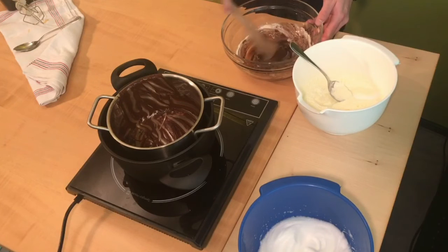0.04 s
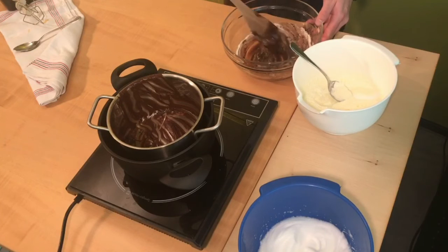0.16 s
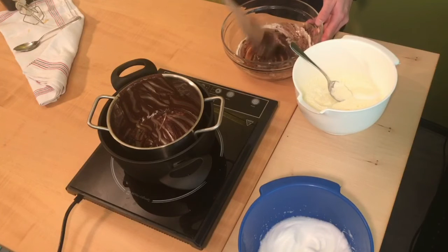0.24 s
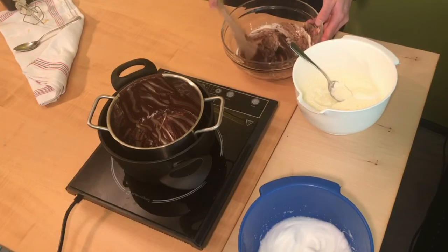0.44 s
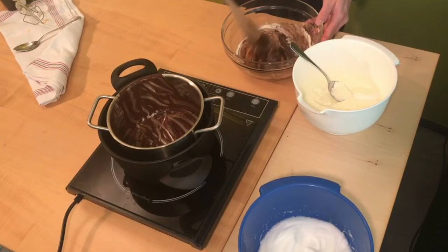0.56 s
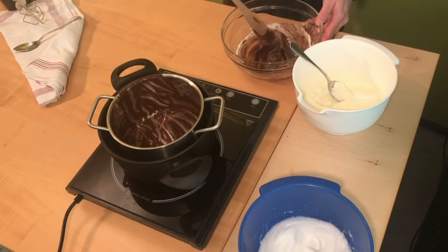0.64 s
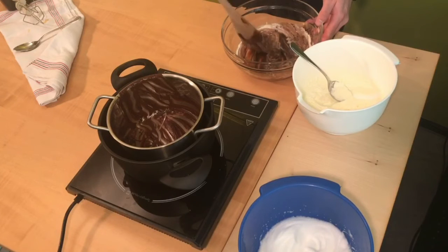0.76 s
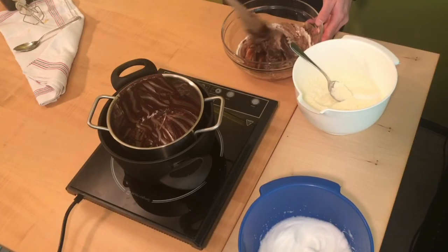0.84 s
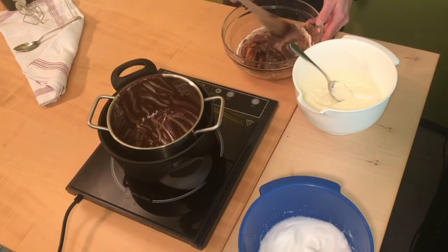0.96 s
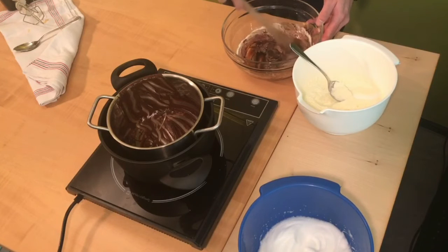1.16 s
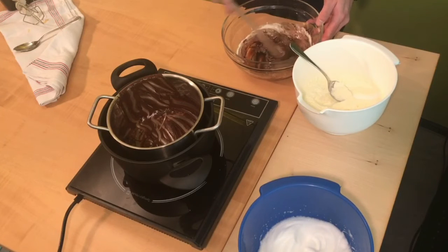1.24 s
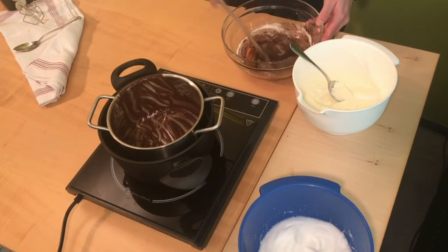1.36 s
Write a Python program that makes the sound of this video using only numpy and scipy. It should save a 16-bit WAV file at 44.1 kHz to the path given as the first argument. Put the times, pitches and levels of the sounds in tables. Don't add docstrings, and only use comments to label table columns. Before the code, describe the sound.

Wet crackle, tiny snaps and gritty blade drag as a spatula works a sticky mixture in a glass bowl, with four irregular knocks, the first loudest, short room reflections and faint fan noise, one mono microphone.

```python
import sys
import numpy as np
from scipy import signal
from scipy.io import wavfile

SR = 44100
rng = np.random.default_rng(int(sys.argv[2]) if len(sys.argv) > 2 else 0)


def volts_from_decibels(level):
    exponent = np.asarray(level, float) / 20
    return 10 ** exponent


def wav_out(sig):
    wavfile.write(sys.argv[1], SR, np.round(np.clip(np.atleast_2d(sig).T, -1, 1) * 32767).astype(np.int16))


N = 61739

# [start_s, level_db (peak), contact_rise_s, thud_db (worktop), room_db]
KNOCKS = [
    (0.2084, -11.5, 0.00054, -36, -10.5),
    (.5540, -28.5, 0.0006, -39.5, -8),
    (1.01, -27.5, 0.00014, -46, -12.5),
    (1.3585, -36, 0.00047, -56.5, -11),
]


def rms_one(x):
    return x / np.sqrt(np.mean(x ** 2) + 1e-20)


def at_hz(points, hz, axis=1):
    points = np.array(points)
    return np.interp(np.log(hz), np.log(points[:, 0]), points[:, axis])


def contour(times_s, levels_db):
    return volts_from_decibels(np.interp(np.arange(N) / SR, times_s, levels_db))


def seconds_after(start_s):
    return np.maximum(np.arange(N) / SR - start_s, 0)


def swell(t, rise_s):
    return 1 - np.exp(-(t / rise_s) ** 2)


def resonance(x, hz, width_hz):
    r = np.exp(-np.pi * width_hz / SR)
    zeros = np.array([1, 0, -1]) * (1 - r * r) / 2
    poles = [1, -2 * r * np.cos(2 * np.pi * hz / SR), r * r]
    return signal.lfilter(zeros, poles, x)


def bandpass(x, low_hz, high_hz):
    return signal.sosfilt(signal.butter(2, [low_hz, high_hz], "band", fs=SR, output="sos"), x)


def bands(white):
    edges = 20 * 2 ** np.arange(0, 10.1, .5)
    for k, (low, high) in enumerate(zip(edges, edges[1:])):
        yield np.sqrt(low * high), bandpass(white[k % 2], low, high)


def struck(start_s, hz, db, t60, rise_s):
    t = seconds_after(start_s)
    return volts_from_decibels(db - 60 * t / t60) * swell(t, rise_s) * np.sin(2 * np.pi * hz * t)


def background():
    # [pitch_hz, density_db (per Hz)]
    air_spectrum = [(12, -28), (20, 7), (67, -7.5), (285, -30), (422, -28), (499, -33.5), (2320, -29),
                    (2990, -35.5), (16000, -47.5)]
    # [pitch_hz, level_db (rms), width_hz]
    fan = [
        (1757, -80, 9),
        (49, -64, 6),
    ]
    white = rng.standard_normal((3, N + SR))
    air = sum(band[SR:] * volts_from_decibels(at_hz(air_spectrum, hz)) for hz, band in bands(white))
    sound = volts_from_decibels(-57.5) * rms_one(air)
    for hz, db, width_hz in fan:
        tone = resonance(resonance(white[2], hz, width_hz), hz, width_hz)
        sound += volts_from_decibels(db) * rms_one(tone[SR:])
    return sound


def snap_colour(high, low):
    # [pitch_hz, width_hz, level_db]
    film = [
        (12400, 900, -4.5),
        (9600, 1400, -10),
    ]
    tick_hz, tick_width_hz = 12270, 6300
    dull_hz, dull_width_hz = 4200, 2440
    bright = resonance(resonance(high, tick_hz, tick_width_hz), tick_hz, 1.7 * tick_width_hz)
    bright += sum(volts_from_decibels(db) * resonance(high, hz, width_hz) for hz, width_hz, db in film)
    return bright + resonance(resonance(low, dull_hz, dull_width_hz), dull_hz, dull_width_hz)


def stirring():
    # [time_s, crackle_db, drag_db (blade on glass)]
    stroke = [(0, -66, -75), (.06, -68.5, -79), (0.119, -80, -81), (.22, -60, -76), (.33, -64.5, -75),
              (.42, -74, -100), (.6, -69, -63.5), (.66, -60.5, -65), (.71, -64, -68.5),
              (0.733, -61.5, -62.5), (.78, -67, -76), (.9, -67.5, -94.5), (0.979, -65.5, -77.5),
              (1.06, -60, -66), (1.131, -68, -100), (1.249, -73, -83), (1.319, -70.5, -79), (1.4, -63, -92)]
    crackle_per_s, grit_per_s, spread_db = 130, 1500, 5.5
    drag_hz, drag_width_hz = 1900, 1100
    times_s, wet_db, drag_db = np.transpose(stroke)
    sizes = volts_from_decibels(spread_db * np.minimum(rng.exponential(1, N), 4)) * rng.choice([-1, 1], N)
    grains = sizes * (rng.random(N) < crackle_per_s / SR)
    smear = rng.standard_normal(N)
    wet = volts_from_decibels(-9) * rms_one(snap_colour(grains, 0.21 * grains))
    wet += volts_from_decibels(-7) * rms_one(snap_colour(smear, 0.13 * smear))
    grit = sizes * (rng.random(N) < grit_per_s / SR)
    grit = resonance(resonance(grit, drag_hz, drag_width_hz), drag_hz, 2 * drag_width_hz)
    return contour(times_s, wet_db) * wet + contour(times_s, drag_db) * rms_one(grit)


def bowl_rub():
    # [time_s, level_db]
    rub_path = [(0, -75), (.1, -87), (.16, -66), (.2, -72), (.3, -79.5), (.4, -75), (.45, -75), (.52, -73),
                (.7, -76), (.85, -75), (.95, -79.5), (1.199, -99), (1.4, -87)]
    hz, width_hz = 300, 130
    rub = resonance(resonance(rng.standard_normal(N), hz, width_hz), hz, width_hz)
    return contour(*np.transpose(rub_path)) * rms_one(rub)


def pops():
    # [start_s, pitch_hz, level_db, t60_s, rise_s]
    pockets = [
        (1.344, 2850, -37, .004, .0003),
        (.2046, 2300, -26, .004, .0002),
        (.2045, 8000, -27, .003, .0002),
        (1.0975, 4200, -51, .0025, .0002),
        (.6405, 4500, -43, .006, .0003),
        (.7262, 3600, -54, .006, .0003),
        (.6925, 2600, -52, .005, .0003),
        (.0225, 3400, -54, .004, .0003),
    ]
    return sum(struck(*pocket) for pocket in pockets)


def snaps():
    # [start_s, level_db (peak), low_part_db (relative)]
    some_snaps = [(0.3159, -28, -26), (0.3759, -54, -20), (0.3853, -51, -22.5), (0.45, -53, -29.5),
                  (0.4809, -55.5, -12), (0.6402, -34, -7), (0.6447, -41, -16), (0.6525, -29.5, -22),
                  (0.7714, -46, -17), (1.0805, -46.5, -11.5), (1.2864, -50.5, -27), (1.3723, -48, -19.5)]
    more_snaps = [(0.0236, -57, 4.5), (0.0268, -47, -27), (.0482, -48.5, -31), (0.115, -63, -4),
                  (0.185, -81, -15), (0.1955, -42, -1.5), (0.312, -48, -25.5), (0.3198, -47, -22),
                  (0.323, -40, -19), (0.3333, -53, -24), (.3425, -72, -22.5), (0.3914, -55.5, -19),
                  (0.3904, -45, -16), (.3934, -56, -22), (.4675, -66.5, -24.5), (0.5435, -47, -10),
                  (.658, -46, -7), (.6592, -54, -14), (.665, -46, -16), (0.6906, -46, -35),
                  (0.692, -55, -2), (0.7256, -42.5, -21), (0.729, -52, -14), (.736, -52, -18),
                  (.800, -49, -23.5), (.809, -49.5, -20), (0.827, -51, -15), (.850, -51, -7),
                  (.876, -50, -13), (.895, -52, -27.5)]
    other_snaps = [(0.9049, -44.5, -22), (0.2031, -26, -29), (0.2044, -25, -5.5), (0.2012, -35, -22),
                   (0.6406, -38, -3.5), (0.655, -46, -25), (1.3655, -50.5, -24), (1.3763, -54, -25),
                   (1.335, -54, -25), (.944, -61.5, -29.5), (0.962, -65, -23.5), (.979, -54, -27),
                   (0.985, -50, -17), (1.002, -46, -17), (1.0423, -47, -21), (1.049, -49, -11),
                   (1.051, -41.5, -29), (1.0972, -61, -22), (1.116, -57, -23), (1.272, -52, -8.5),
                   (1.3038, -56.5, -26.5), (1.315, -57.5, -23), (1.317, -41.5, -22.5), (1.343, -55, -16),
                   (1.3613, -51, -30), (1.3725, -45.5, -13.5), (1.387, -51, -25), (1.3931, -44.5, -20)]
    length, decay_s = 300, 0.00052
    high, low = np.zeros(N + length), np.zeros(N + length)
    t = np.arange(length) / SR / decay_s
    shape = t * np.exp(1 - t * 2.075)
    for start_s, db, low_db in list(some_snaps) + list(more_snaps) + list(other_snaps):
        i = int(start_s * SR)
        burst = rng.choice([-1., 1.], length) * shape * volts_from_decibels(db + 6.0)
        high[i:i + length] += burst
        low[i:i + length] += burst * volts_from_decibels(low_db + 10.5)
    return snap_colour(high[:N], low[:N])


def bowl_modes(ring_share):
    # [pitch_hz, level_db, t60_s]
    modes_per_knock = [
        [(677, -3, 0.027), (1030.5, -1, 0.017), (2102, 12, 0.0054), (2660, 7.5, 0.0096), (1500, -9, 0.032),
         (4703, -37, 0.004), (3500, -24.5, .004), (5700, -39.5, .004)],
        [(418, -5, 0.03), (515, 3, 0.021), (865, -2.5, 0.027), (1260, -0.5, 0.034), (1860, 9, 0.014),
         (3175, 3.5, 0.011), (4800, 6, 0.0049), (7700, -9.5, 0.017)],
        [(548, -2, 0.012), (1280, -1.5, 0.021), (2035, 3.5, 0.0086), (3090, -3, 0.011), (5560, -35, 0.0056),
         (6700, -8, 0.0075), (7840, -8.5, 0.011), (9590, -7.5, 0.012), (12800, -15, 0.01), (15000, -6, 0.0098)],
        [(512, 8.5, 0.019), (930, 3, 0.012), (1380, -25, 0.04)],
    ]
    lags_s = [0.00098, 0.0003, 0.00025, 0.00027]
    sound = np.zeros(N)
    for (start_s, level_db, rise_s, *_), modes, lag_s in zip(KNOCKS, modes_per_knock, lags_s):
        for hz, db, t60 in modes:
            late_s = lag_s * max(1 - np.log2(hz / 500) / 3, 0)
            mode = struck(start_s + late_s, hz, level_db + db, ring_share * t60, rise_s)
            sound -= mode / np.sqrt(ring_share)
    return sound


def crack(start_s, rise_s, db, decay_s, top_hz):
    t = seconds_after(start_s)
    hiss = rms_one(bandpass(rng.standard_normal(N), 2503, top_hz))
    return volts_from_decibels(db) * hiss * np.exp(-t / decay_s) * swell(t, rise_s)


def worktop(start_s, thud_db, tilt_db, t60, modal_db):
    # [level_db, t60_s], with their pitches [pitch_hz]
    board_modes = [(-4.5, 0.38), (-9, 0.5), (-6, 0.22), (-5, .3), (2, 0.29), (-5, 0.41), (-16.5, .25),
                   (-1.5, 0.35), (-1.5, .25), (-0.5, .2), (-16, 0.1)]
    board_hz = [73.5, 126, 154, 174, 220.5, 272.5, 344, 405, 431, 461, 726]
    low_hz, high_hz, rise_s = 35, 480, 0.0056
    t = seconds_after(start_s)
    blur = np.zeros(N)
    for hz, band in bands(rng.standard_normal((2, N))):
        if low_hz < hz < 1500:
            blur += band * volts_from_decibels(tilt_db * np.log2(hz / 150)) / (1 + (hz / high_hz) ** 2)
    sound = rms_one(blur) * volts_from_decibels(thud_db + 0.5 - 60 * t / t60) * swell(t, rise_s)
    signs = rng.choice([-1, 1], len(board_modes))
    for sign, hz, (db, ring_s) in zip(signs, board_hz, board_modes):
        sound += sign * struck(start_s, hz, modal_db + db, ring_s, rise_s)
    return sound


def ringing_glass():
    # [level_db, t60_s, split_hz], their centres [pitch_hz] and pair balance [ratio]
    glass_modes = [(-44, .5, 3), (-48, .28, 4), (-51, .15, 14), (-59, .11, 25), (-46, .14, 19),
                   (-59, .22, 17), (-64, .14, 20), (-60, .09, 23), (-60, .12, 18), (-70, .08, 20),
                   (-63, .08, 20), (-76, .08, 17), (-64, .08, 30), (-70, .14, 25), (-76, .15, 20)]
    glass_hz = [1017, 1844, 3965, 4150, 5232, 6595, 7542, 8150, 9695, 11660, 13200, 15100, 7316, 6783, 4834]
    pair_balance = [.3, 1, .9, .6, .8] + [.75] * 10
    freedom_db = [
        -22,
        4,
        -22,
        -52,
    ]
    flutter_db, flutter_hz = 2.5, 60
    step = SR // flutter_hz
    sound = np.zeros(N)
    for hz, balance, (db, t60, split_hz) in zip(glass_hz, pair_balance, glass_modes):
        drift = rng.standard_normal(N // step + 2)
        drift = np.interp(np.arange(N) / step, np.arange(len(drift)), drift)
        flutter = volts_from_decibels(flutter_db * min(hz / 4000, 1) * drift)
        for (start_s, *_), free_db in zip(KNOCKS, freedom_db):
            upper = struck(start_s, hz + split_hz / 2, db + free_db, t60, 0.0015)
            lower = struck(start_s, hz - split_hz / 2, db + free_db, t60, 0.002)
            sound += flutter * (upper - balance * lower)
    return sound


def knocks():
    # [crack_db, crack_decay_s, worktop_tilt_db (per octave), worktop_t60_s, worktop_modal_db]
    contacts = [
        (-37.5, 0.0025, -3, 0.36, -44.5),
        (-38.5, 0.0025, -0.5, 0.4, -36),
        (-38.5, 0.0024, -4, 0.3, -60.5),
        (-60, 0.0017, 2, 0.2, -66.5),
    ]
    crack_tops_hz = [13000, 10500, 16300, 8000]
    crack_room_db = [3, -5, 0, -4]
    glass = ringing_glass()
    dry = bowl_modes(1) + glass
    send = volts_from_decibels(-17) * glass
    far = bowl_modes(0.59)
    for knock, contact, top_hz, echo_db in zip(KNOCKS, contacts, crack_tops_hz, crack_room_db):
        start_s, _, rise_s, thud_db, room_db = knock
        crack_db, decay_s, *board = contact
        hiss = crack(start_s, rise_s, crack_db, decay_s, top_hz)
        dry += hiss + worktop(start_s, thud_db, *board)
        send += volts_from_decibels(room_db + echo_db) * hiss
    return dry, send + far_send(far)


def far_send(far):
    starts = [int(knock[0] * SR) for knock in KNOCKS]
    sent = np.zeros(N)
    for start, end, knock in zip(starts, starts[1:] + [N], KNOCKS):
        sent[start:end] = volts_from_decibels(knock[4]) * far[start:end]
    return sent


def kitchen(x):
    # [pitch_hz, t60_s, colour_db]
    room = [(60, .5, 2), (300, .36, 2), (900, .27, 3), (1900, .21, 3), (2650, .15, -8), (3500, .18, 4),
            (8000, .17, 0), (16000, .12, -3)]
    t = np.arange(SR // 2) / SR
    tail = np.zeros(len(t))
    for hz, band in bands(rng.standard_normal((2, len(t)))):
        tail += band * volts_from_decibels(at_hz(room, hz, axis=2) - 60 * t / at_hz(room, hz))
    tail *= swell(t, 0.00089)
    return signal.fftconvolve(x, tail / np.sqrt(np.sum(tail[:SR // 10] ** 2)))[:N]


def scene():
    bed = background() + stirring() + bowl_rub()
    bursts, tears = pops(), snaps()
    hits, hits_send = knocks()
    room = kitchen(hits_send + volts_from_decibels(-9.5) * bursts + volts_from_decibels(-17) * tears)
    return (bed + bursts + tears + hits + room)[None]


def roll_off(x):
    return signal.sosfilt(signal.butter(12, 16980, fs=SR, output="sos"), x)


def record(dry):
    cut = signal.sosfilt(signal.cheby2(10, 50, 16900, fs=SR, output="sos"), dry)
    return roll_off(cut)


dry = scene()
out = record(dry)
wav_out(out)
```